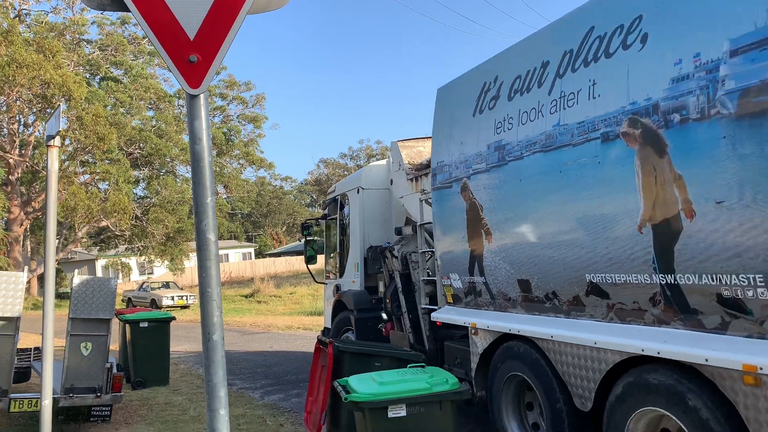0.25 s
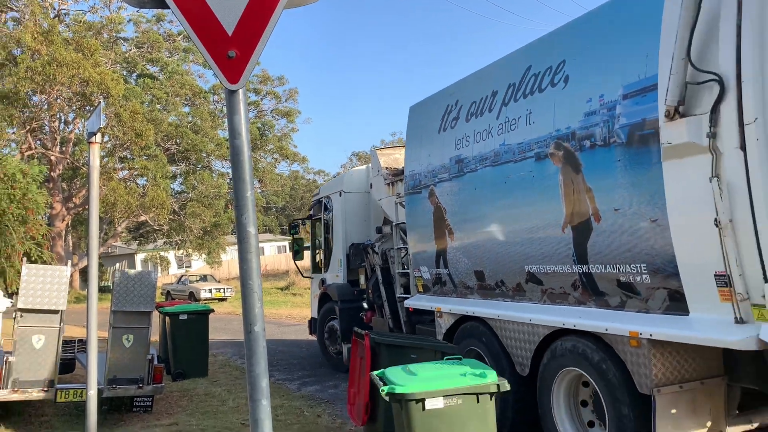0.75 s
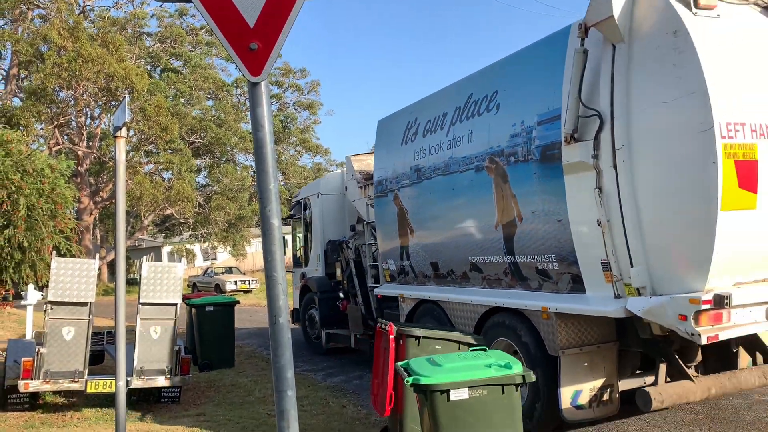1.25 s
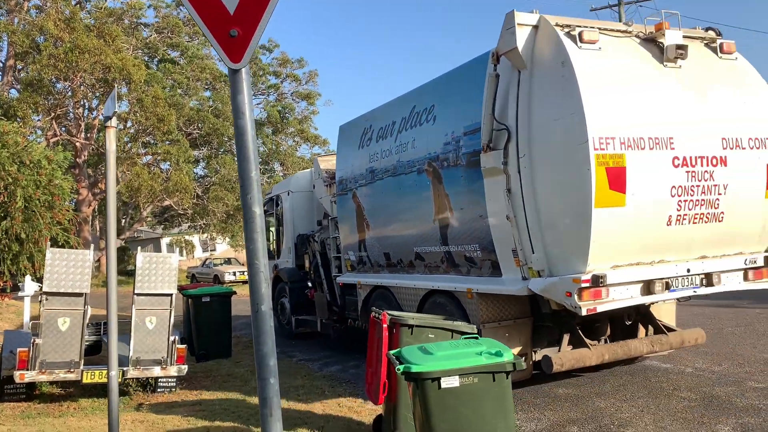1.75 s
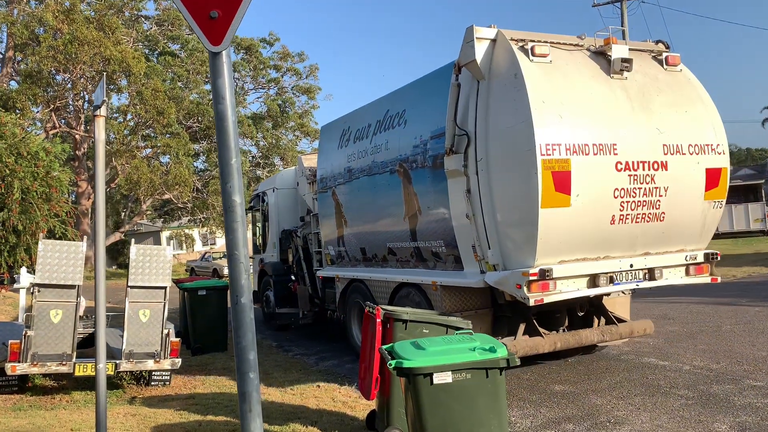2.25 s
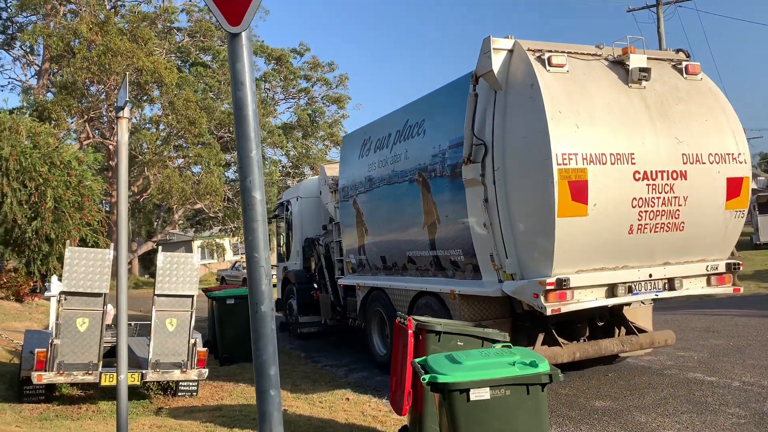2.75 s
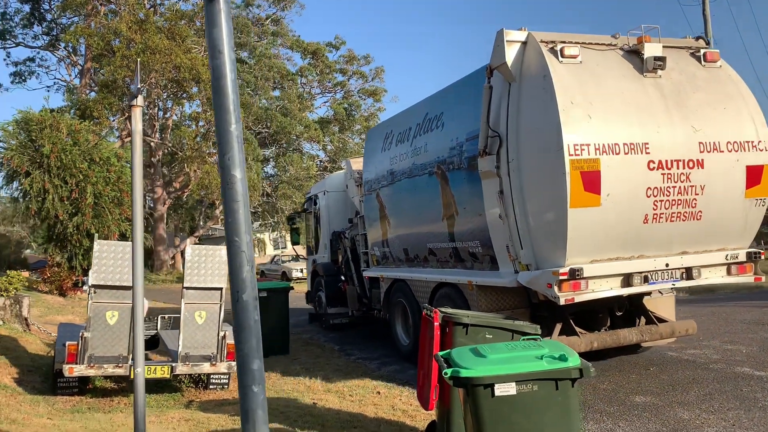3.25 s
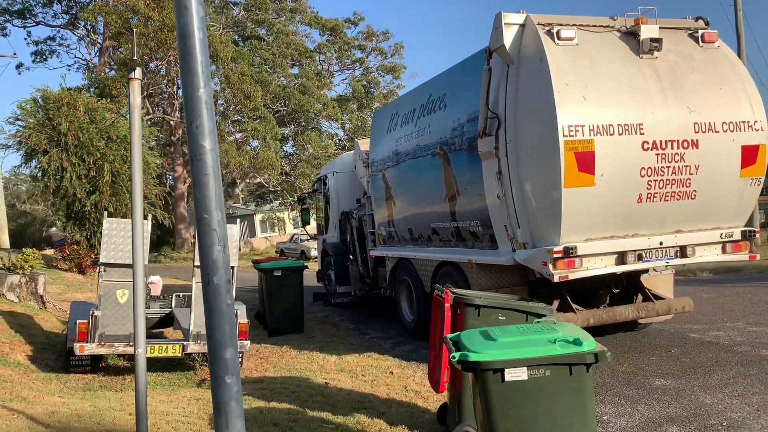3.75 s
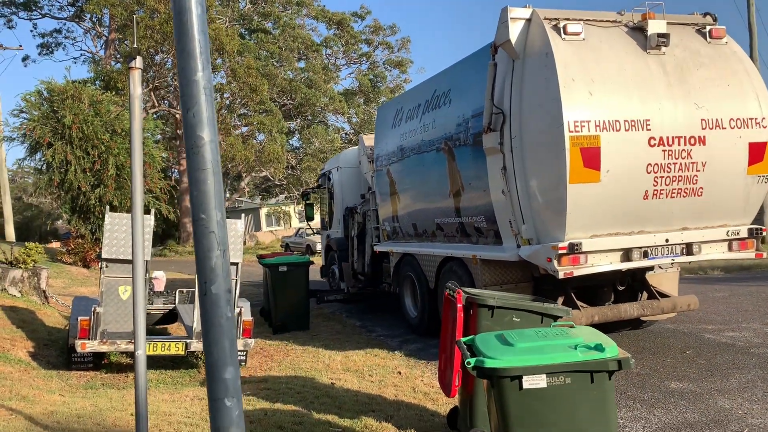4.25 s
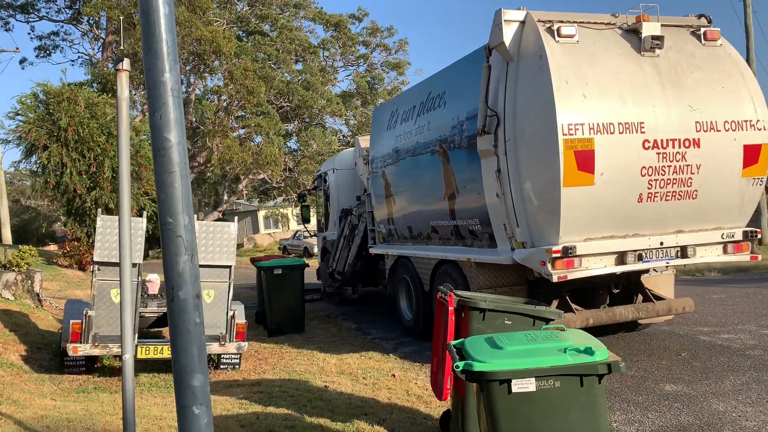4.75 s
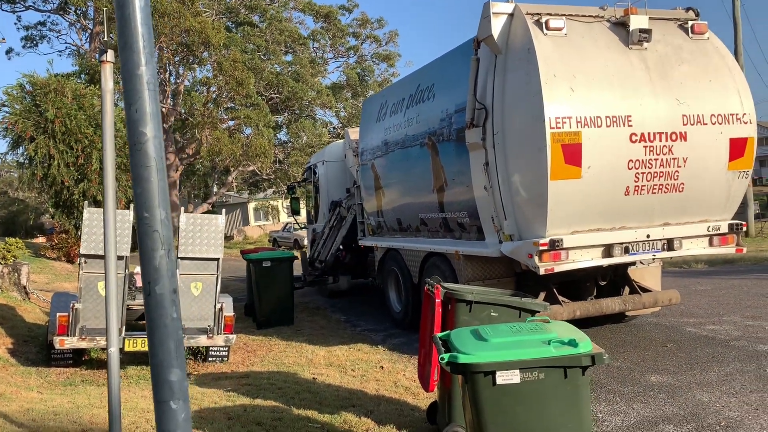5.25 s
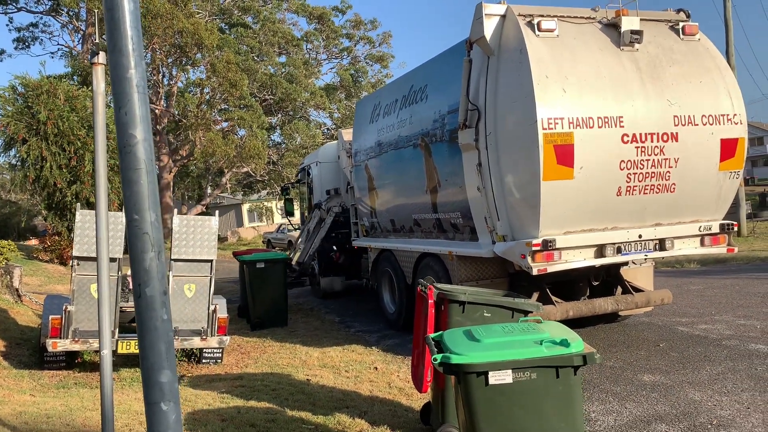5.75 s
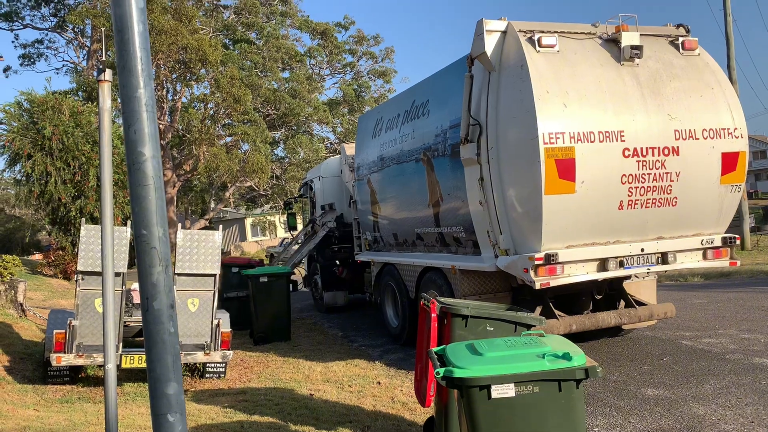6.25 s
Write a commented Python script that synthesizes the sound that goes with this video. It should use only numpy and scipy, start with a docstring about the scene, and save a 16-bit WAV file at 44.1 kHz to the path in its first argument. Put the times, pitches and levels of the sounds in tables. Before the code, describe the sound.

Close on a quiet street, a garbage truck's diesel growls and rises under throttle with a turbo whine, then abruptly falls as it coasts. Tyre rumble fades, brakes faintly squeal and groan, the engine catches in uneven surges and settles to a clattering idle. Steel clanks and a thump mark the stop. Dull knocks follow, then the bin arm hums and lands with a clank, thump and air puff. Outdoor handheld stereo.

```python
"""A six-cylinder diesel throbs, growls and whines as a garbage truck pulls past; the driver lifts off and brakes.
Firing rate and fuel set the exhaust orders and the noise pulses that ring block, covers and panels.
A turbo tone follows the throttle, gears whine, tyres rumble to standstill; gated, nearly pure tones squeal,
groan and squeak. Noise bursts through resonant modes clank, knock and scrape, with a faint answer from houses.
At idle a pump loads up, its housing and hoses ring, and it hums as the bin arm moves."""
import sys
import numpy as np
from scipy import signal
from scipy.fft import rfft, irfft, next_fast_len
from scipy.io import wavfile
from scipy.ndimage import uniform_filter1d, map_coordinates

SR = 44100
rng = np.random.default_rng(int(sys.argv[2]) if len(sys.argv) > 2 else 0)


def output_pcm(signal):
    """Save a mono or channel-first signal as 16-bit PCM at the path in sys.argv[1].

    Samples are clipped to [-1, 1] before scaling.
    """
    pcm = np.clip(np.atleast_2d(signal).T, -1, 1) * 32767
    wavfile.write(sys.argv[1], SR, np.round(pcm).astype(np.int16))


N = 286650
TIME_S = np.arange(N) / SR

# engine speed, which revs, sinks, hunts and settles: t/s, firing rate/Hz
SPEED = [(0, 71.5), (.5, 79.4), (.68, 80.6), (.76, 75.6), (.85, 61.5), (1, 51.6), (1.19, 44.7),
         (1.66, 33.8), (1.86, 39.3), (1.98, 48.2), (2.11, 35.5), (2.28, 42.5), (2.4, 38), (2.53, 41.3),
         (3, 41.9), (5.39, 41.9), (5.6, 41.3)]
# pulling, coasting, a catch near stalling, one cut, idle: t/s, fuel over idle/dB
FUEL = [(0, 8.5), (.69, 7.7), (.77, -6), (1.05, -6), (1.35, -5.5), (1.6, -7.5), (1.72, -2.5), (1.87, -1),
        (1.96, 5), (2.03, 1), (2.06, -20), (2.095, -14), (2.125, 0), (2.19, 4), (2.3, 1), (2.37, -2),
        (2.44, .5), (4, 0), (4.4, 1)]
LIFT_S, LIFT_FALL_S = .69, 0.04  # driver lifts off; duration of the lift
PUMP_START_S, PUMP_RISE_S = 3.91, 3.2  # arm pump takes up load

# exhaust pipe response: f/Hz, level/dB
PIPE = [(33, -14), (42, -5), (60, 1.5), (72, -0.5), (82, 0), (100, -1), (122, -16), (145, -29),
        (160, -15.5)]
# firing tone and octave before the pipe: level at idle fuel/dB, growth/(dB per dB fuel)
FIRST_DB, FIRST_GROWTH = -20.5, 1.52
OCTAVE_DB, OCTAVE_GROWTH = -20.5, 0.98
# weaker orders of unequal cylinders: multiple of firing rate, level at idle/dB
UNEVEN = [(1.5, -33), (2.5, -46), (3, -36.5), (10 / 3, -36), (4.5, -47), (41 / 6, -43), (8, -46)]
# exhaust growl under throttle: multiple of firing rate, level/dB
GROWL = [(1.5, -35), (3.5, -37.5), (4.5, -35.5), (5, -34.5), (6, -35.5), (6.5, -35.5)]
# manifold and heat shield modes: f/Hz, width/Hz, relative level/dB
RASP = [(420, 60, 0), (495, 60, 1.5), (660, 70, -3), (1190, 110, -5.5), (1600, 150, -8)]
RASP_DB = -33.5

# chassis and silencer spectrum: f/Hz, relative level/dB per Hz
BODY = [(35, -30), (60, -8.5), (105, -8.5), (140, -13.5), (170, -20.5), (230, -17.5), (330, -17),
        (410, -16.5), (540, -16.5), (650, -22.5), (790, -33.5), (1200, -52.5)]
# engine block modes: f/Hz, width/Hz, relative level/dB
BLOCK = [(917, 83, -3.5), (1087, 97, -0.5), (1256, 52, -5), (1497, 50, -6.5), (1935, 106, -9),
         (2330, 336, -13)]
# chassis panel modes: f/Hz, width/Hz, relative level/dB
PANEL = [(1069.3, 26.6, -1), (1472, 22, -14)]
# panel hum, which dips and later swells: t/s, relative level/dB
PANEL_SWELL = [(0, 1), (1.3, -7), (2.3, 2), (3.6, 1.5), (4.4, 2.5), (6.5, 7.5)]
# valve and injector spectrum: f/Hz, relative level/dB per Hz
TICKS = [(800, -31), (1500, -4), (2200, -1.5), (3200, -12), (3750, -4.5), (5100, -8.5), (6800, -15.5),
         (10000, -37)]
# thin steel cover modes: f/Hz, width/Hz, relative level/dB
COVERS = [(2643, 45, 3.5), (2819, 11, -1), (2980, 16, -1.5), (3340, 20, 0), (3480, 20, -0.5),
          (3610, 21, 1.5), (3882, 22, 2.5), (4230, 28, -5), (4730, 37, -3), (5120, 20, -6.5)]
# fan and intake air spectrum, also the puffs': f/Hz, relative level/dB per Hz
AIR = [(100, -52), (550, 2), (780, 2), (1200, 6.5), (2200, 9), (4000, -5), (7000, 3), (10000, -8),
       (11800, 1), (15500, -1.5)]
# laws of the layers: idle level/dB, growth/(dB per speed doubling), growth/(dB per dB fuel), full pump load/dB
BODY_LAW = (-29.5, 8.5, 0.15, 4.5)
KNOCK_LAW = (-38, 7.5, 0.07, -2)
PANEL_LAW = (-39.5, 4.5, 0.35, -2.5)
TICK_LAW = (-43.5, 4.5, 0.5, 1.5)
COVER_LAW = (-51.5, 9, 0.58, 5)
AIR_LAW = (-42.5, 10.5, 0.35, 1.5)
OVERRUN_DB = -6  # below this fuel the clatter is all mechanical
WANDER_DB = 1.5  # scale of each layer's slow random swing
# engine's ground bounce: t/s, extra path/m, share reflected
GROUND = [(0, 0.22, 0.12), (3.9, 0.22, 0.22), (4.7, 0.26, 0.44), (5.9, 0.26, 0.51), (6.5, 0.22, 0.72)]

TURBO_START_HZ, TURBO_IDLE_HZ = 10450, 5840
SPOOL_HZ_PER_S, WIND_DOWN_S = 2950, .75  # rise under throttle; time constant of the fall
RESPOOL_S, RESPOOL_HZ_PER_S = 5.65, 480  # pump load lifts the tone again
BOOST_DB, WHISTLE_DB = -46.5, -55  # broad tone under throttle; thin tone
FREE_SHARE = .36  # broad tone left at lift-off
WHISTLE_FROM_S = 2.1  # thin tone emerges as the engine picks up again

# tyres and swaying body spectrum: f/Hz, relative level/dB per Hz
ROLL = [(40, -20), (90, 4.5), (130, 0), (200, -2), (280, -3), (380, -13), (500, -4.5), (760, -28.5),
        (1100, -24.5), (1800, -24.5), (3500, -38.5)]
ROLL_DB, BRAKE_S, STOP_S = -28, 0.67, 3.1

# loose steel clusters: t/s, level/dB, length/s, dull above f/Hz
CLANKS = [(.877, -31, 0.011, 3000), (1.209, -29, .008, 1900), (2.247, -31.5, 0.04, 6000),
          (2.627, -22.5, 0.038, 5500), (2.68, -30, 0.026, 4500), (2.768, -35.5, 0.048, 2200),
          (2.818, -30, 0.034, 2300), (3.075, -34, 0.045, 4400), (3.135, -35, 0.016, 5000),
          (3.172, -29.5, 0.022, 4000), (3.2, -27, 0.026, 4000), (4.565, -37, .012, 7000),
          (4.635, -37, .012, 7000), (4.775, -37, .012, 6000), (6.095, -33, .02, 2800),
          (6.128, -29, 0.02, 5500), (6.157, -27.5, 0.055, 4000)]
# single hard steel blows: t/s, level/dB, length/s, dull above f/Hz
STRIKES = [(1.221, -25, .002, 1600), (1.225, -21.5, .003, 1600), (1.231, -25, .002, 1600),
           (2.272, -29, .006, 5000), (2.637, -25, .003, 5000), (2.645, -18.5, .005, 6000),
           (2.661, -20, .004, 8000), (2.698, -29, .007, 4200), (3.101, -34, .003, 7000),
           (3.142, -29, .003, 4600), (3.195, -29.5, .003, 3200), (3.218, -24.5, .004, 4400),
           (3.233, -27.5, .003, 3400), (6.144, -21, .002, 5500), (6.162, -19.5, .003, 2800),
           (6.169, -24, .004, 2600), (6.187, -25, .003, 4000), (6.204, -23, .003, 7000),
           (6.27, -32, .004, 4000)]
# body panel and bin arm modes: f/Hz, width/Hz, relative level/dB
STEEL = [(1137, 260, 10.5), (1420, 540, 9), (1740, 370, 6), (2180, 330, 1.5), (2940, 340, 1.5),
         (3355, 190, 0.5), (3920, 450, 4.5), (4000, 90, -1), (4480, 440, -4), (5100, 410, -0.5),
         (5740, 1600, -10.5)]
# dull knocks and short swells of a hollow ring near 1.1 kHz: t/s, level/dB, length/s, dull above f/Hz
DULL_RINGS = [(4.354, -28.5, .022, 2400), (4.392, -30, .014, 2400), (5.022, -27, .02, 2400),
              (5.456, -27.5, .028, 2400), (5.528, -29, .014, 2000)]
# modes of the dull knocks and swells: f/Hz, width/Hz, relative level/dB
HOLLOW = [(872, 48, 14.5), (1110, 70, 11), (1440, 160, 4), (1850, 200, 2), (2280, 400, 0)]
# decay of the street's answer: f/Hz, t60/s
STREET = [(150, 0.28), (2000, 0.49), (10000, 0.044)]
# squeals, a low groan, later thin squeaks and a chirp: t/s, length/s, start f/Hz, end f/Hz, level/dB
PURE_NOTES = [(1.28, .08, 12050, 12060, -52), (1.5, .58, 5658, 5670, -56), (2.13, .22, 5672, 5665, -51),
              (2.345, .06, 5665, 5665, -44), (2.39, .08, 5662, 5660, -48), (2.05, .8, 282, 268, -38.5),
              (2.22, .3, 11320, 11340, -62), (3.6, .15, 12110, 12150, -48), (3.72, .14, 12170, 12210, -55),
              (4.225, .05, 6060, 6100, -40)]
# air valve puffs: t/s, level/dB, length/s
PUFFS = [(1.9, -61, 0.057), (2.17, -52, 0.1), (6.097, -35, 0.081)]
# scrapes of brake shoes and arm slide: peak t/s, level/dB, half length/s
SCRAPES = [(2.675, -33, .04), (2.8, -38.5, .08), (3.12, -40, .05), (3.22, -35.5, .03), (6.19, -30, .065)]
# scrape spectrum: f/Hz, relative level/dB per Hz
SCRAPE = [(300, -28), (560, 13.5), (760, 2), (1300, 2), (2500, -4), (4600, -8.5), (6000, -10), (10000, -20)]
# heavy body thumps at the stop and arm moves: t/s, level/dB, length/s
THUMPS = [(2.65, -28.5, 0.22), (4.224, -32, 0.29), (4.35, -25.5, 0.054), (6.082, -18.5, 0.125)]
# thump spectrum: f/Hz, relative level/dB per Hz
THUD = [(28, -53), (50, 3), (70, -6.5), (120, -15), (220, -16.5), (500, -18.5), (900, -57), (3000, -88)]
# pump housing and hose modes: f/Hz, width/Hz, relative level/dB
HOSES = [(326.4, 18, 4.5), (408, 26.6, 4.5), (549, 18, -2.5), (861, 68, -6), (2490, 390, -15),
         (3750, 690, -22)]
ARM_S, ARM_HUM_DB = 5.65, -38  # arm moves out, the straining pump hums

# left-right likeness of diffuse layers: f/Hz, likeness (-1 to 1)
ALIKE = [(60, 0.91), (300, 1), (640, 0.64), (1200, 1), (2200, 0.27), (4500, 0.21), (12000, -0.13)]
# microphone ports with two treble dips: f/Hz, level/dB
PORTS = [(7000, -0.5), (8400, -22.5), (9800, 8), (12450, -0.5), (13400, -22), (14700, 3)]
# channel imbalance: f/Hz, left minus right/dB
LEAN = [(60, 1), (200, 0.5), (400, 2), (700, 2.5), (1300, -1), (2400, 0), (4400, -3), (8000, 0)]
# channel phase: f/Hz, left lead/rad
SKEW = [(60, -0.24), (300, -0.082), (650, -0.44), (950, -0.89), (2900, 0.99), (7000, 0.35)]
TOP_HZ = 15850


def amp(db):
    """Decibels to gain."""
    return 10 ** (np.asarray(db) / 20)


def unit(x):
    """Scale to rms 1."""
    return x / np.sqrt(np.mean(x ** 2) + 1e-20)


def along(points, hz):
    """Read (f/Hz, value) points on a log-frequency axis."""
    f, value = np.transpose(points)
    return np.interp(np.log(hz + 1), np.log(f + 1), value)


def curves(rows):
    """One per-sample curve for each column after the time."""
    s, *columns = np.transpose(rows)
    return [np.interp(TIME_S, s, column) for column in columns]


def wobble(rate_hz):
    """Smooth random curve with rate_hz knots per second."""
    return map_coordinates(rng.standard_normal(400), [TIME_S * rate_hz], mode="wrap")


def noise():
    """Two channels of white noise."""
    return rng.standard_normal((2, N))


def filtered(x, response):
    """Apply a complex frequency response."""
    size = next_fast_len(N + SR // 4)
    spectrum = rfft(x, size) * response(np.fft.rfftfreq(size, 1 / SR))
    return irfft(spectrum, size)[..., :N]


def colour(points):
    """Response of a (f/Hz, level/dB) spectrum."""
    return lambda hz: amp(along(points, hz))


def resonances(modes, low_hz):
    """Response of damped modes on a panel that radiates little below low_hz."""
    def response(f):
        ring = 0
        for k, (centre, width, db) in enumerate(modes):
            mode = 1j * f * width / (centre * centre - f * f + 1j * f * width)
            ring = ring + (-1) ** k * amp(db) * mode  # alternating sign
        return ring * f ** 4 / (f ** 4 + low_hz ** 4)
    return response


def spread(pair, response):
    """Colour two unrelated signals and mix to left and right with frequency-dependent likeness."""
    def mid_side(hz):
        turn = np.arccos(np.clip(along(ALIKE, hz), -1, 1)) / 2
        return response(hz) * np.array([np.cos(turn), np.sin(turn)])
    mid, side = filtered(pair, mid_side)
    return np.array([mid + side, mid - side])


def burst(start_s, length_s, fall_s):
    """Envelope: fast rise, hold, exponential fall."""
    t = TIME_S - start_s
    return np.clip(t / 0.0058, 0, 1) * np.exp(-np.clip((t - length_s) / fall_s, 0, 50))


def throttle():
    """1 while pulling, 0 once the driver has lifted off."""
    return np.clip(1 - (TIME_S - LIFT_S) / LIFT_FALL_S, 0, 1)


def pump():
    """Hydraulic pump load, 0 to 1."""
    return np.clip((TIME_S - PUMP_START_S) / PUMP_RISE_S, 0, 1)


def strokes(phase, decay, scatter_db, alternate_db, bed):
    """One dying blow per whole phase over a steady bed; strength scatters and alternates."""
    index = phase.astype(int)
    luck = rng.uniform(-2, 2, size=2000)[index]
    size_db = scatter_db * luck + alternate_db * np.cos(np.pi * index)
    blows = amp(size_db) * np.exp(-(phase % 1) / decay)
    return bed + uniform_filter1d(blows, size=200)  # softened onset


def cyclic(phase, share):
    """Noise that partly repeats every six-firing engine cycle, its pattern slowly drifting."""
    cycles = rng.standard_normal(size=(2, 2, 4096))
    place = (phase / 6 % 1 * 4096).astype(int)
    drift = .8 * wobble(2)
    pattern = np.cos(drift) * cycles[0][:, place] + np.sin(drift) * cycles[1][:, place]
    return np.sqrt(share) * pattern + np.sqrt(1 - share) * noise()


def exhaust(phase, firing_hz, fuel_db):
    """Pipe sounds the firing rate, its octave and unequal-cylinder orders; growls under throttle."""
    angle = 2 * np.pi * phase
    first_db = FIRST_DB + FIRST_GROWTH * fuel_db + along(PIPE, firing_hz)
    second_db = OCTAVE_DB + OCTAVE_GROWTH * fuel_db + along(PIPE, 2 * firing_hz)
    unsteady_db = .75 * amp(-1.5 * np.clip(fuel_db, -7, 0))  # lean firing is uneven
    first = amp(first_db + unsteady_db * wobble(13)) * np.cos(angle)
    octave = amp(second_db + 0.67 * unsteady_db * wobble(12)) * np.cos(2 * angle)
    lope = sum(amp(db + 1.5 * wobble(7)) * np.sin(order * angle + .35 * wobble(10))
               for order, db in UNEVEN)
    growl = sum(amp(db + 3 * wobble(7)) * np.sin(order * angle + .5 * wobble(13))
                for order, db in GROWL)
    unequal = amp(.7 * np.minimum(fuel_db, 0))  # cylinders differ less on little fuel
    orders = (1 - throttle()) * unequal * lope + throttle() * growl
    return np.sqrt(2) * (first + octave + orders)


def rasp(phase):
    """Hard, uneven firings shake the manifold and heat shield under throttle."""
    pulses = strokes(phase, decay=.35, scatter_db=1.5, alternate_db=1.5, bed=.2)
    blows = cyclic(phase, share=.8) * pulses
    return amp(RASP_DB) * throttle() * unit(spread(blows, resonances(RASP, low_hz=330)))


def engine(phase, firing_hz, fuel_db):
    """Firings shake chassis, block and panel; valves tick at twice the rate and ring covers; air rushes."""
    shake = cyclic(phase, share=.72) * strokes(phase, decay=1.0, scatter_db=.7, alternate_db=1.0, bed=0.4)
    clatter = cyclic(phase, share=.7) * strokes(phase, decay=0.55, scatter_db=1.0, alternate_db=0.3, bed=0.6)
    drive = cyclic(phase, share=.85) * strokes(phase, decay=0.5, scatter_db=.5, alternate_db=0.3, bed=0.45)
    tapping = strokes(2 * phase, decay=1.0, scatter_db=4.5, alternate_db=1.0, bed=1.0)
    rattle = noise() * strokes(2 * phase, decay=.4, scatter_db=2.0, alternate_db=1.0, bed=.3)
    body = spread(shake, colour(BODY))
    knock = spread(clatter, resonances(BLOCK, low_hz=755))
    panel = spread(drive, resonances(PANEL, low_hz=900)) * amp(curves(PANEL_SWELL)[0])
    ticks = spread(cyclic(phase, share=0.3) * tapping, colour(TICKS))
    covers = spread(rattle, resonances(COVERS, low_hz=2000))
    air = spread(noise() * amp(1.3 * wobble(40)), colour(AIR))

    doublings = np.log2(firing_hz / firing_hz[-1])
    burning_db = np.maximum(fuel_db, OVERRUN_DB)
    layers = [(body, BODY_LAW), (knock, KNOCK_LAW), (panel, PANEL_LAW),
              (ticks, TICK_LAW), (covers, COVER_LAW), (air, AIR_LAW)]
    out = np.zeros((2, N))
    for sound, (idle_db, speed_db, fuel_growth, pump_db) in layers:
        work_db = speed_db * doublings + fuel_growth * burning_db + pump_db * pump()
        out += unit(sound) * amp(idle_db + work_db + WANDER_DB * wobble(7))
    return out


def off_the_road(x):
    """A slightly late ground reflection cuts a shifting comb; grass swallows its treble."""
    path_m, share = curves(GROUND)
    late_s = TIME_S - path_m / 343  # speed of sound, m/s
    soft = filtered(x, lambda hz: 1 / (1 + (hz / 4200) ** 6))
    bounce = np.array([map_coordinates(channel, [late_s * SR], order=3) for channel in soft])
    return x + share * bounce


def whistle(hz, width_hz):
    """Tone following hz, blurred into a narrow noise band."""
    blur = filtered(noise(), lambda f: np.exp(-(f / width_hz) ** 2))
    angle = 2 * np.pi * np.cumsum(hz) / SR
    left = blur[0] * np.cos(angle) + blur[1] * np.sin(angle)
    right = blur[0] * np.cos(angle + 1) + blur[1] * np.sin(angle + 1)
    return unit(np.array([left, right]))


def whines(firing_hz):
    """Turbo blade tone, broad under throttle and thin later; gear whine fades as the cab moves away."""
    spooled_hz = TURBO_START_HZ + SPOOL_HZ_PER_S * np.minimum(TIME_S, LIFT_S)
    spin = np.exp(-np.maximum(TIME_S - LIFT_S, 0) / WIND_DOWN_S)
    respool_hz = RESPOOL_HZ_PER_S * np.maximum(TIME_S - RESPOOL_S, 0)
    turbo_hz = TURBO_IDLE_HZ + (spooled_hz - TURBO_IDLE_HZ) * spin + respool_hz
    boost = np.maximum(throttle(), FREE_SHARE * spin)
    broad = amp(BOOST_DB) * boost * whistle(turbo_hz, width_hz=260)
    emerging = np.clip((TIME_S - WHISTLE_FROM_S) / .1, 0, 1)
    thin = amp(WHISTLE_DB + 1.5 * wobble(9)) * emerging * whistle(turbo_hz, width_hz=80)
    gears = amp(-36.5 - 28 * TIME_S) * whistle(40.1 * firing_hz, width_hz=60)
    return broad + thin + gears


def rolling():
    """Tyres rumble and the body jolts, fading until the brakes stop the truck."""
    motion = np.clip((STOP_S - TIME_S) / (STOP_S - BRAKE_S), 0, 1)
    jolts = amp(2.5 * wobble(24))
    return amp(ROLL_DB) * motion * unit(spread(noise() * jolts, colour(ROLL)))


def clanks(hits, modes, attack_s, fall_s):
    """Noise bursts ring the modes; soft contacts are dull, each spot has its own colour."""
    out = np.zeros((2, N + SR))
    size = SR // 3
    t, hz = np.arange(size) / SR, np.fft.rfftfreq(size, 1 / SR)
    body = resonances(modes, low_hz=800)(hz)
    for s, db, length_s, dull_hz in hits:
        contacts = rng.standard_normal((3, size)) * amp(2.2 * wobble(300)[:size])
        stereo = contacts[0] + 1.05 * contacts[1:]  # shared plus one per channel
        spot_db = 3 * map_coordinates(rng.standard_normal(200), [hz / 120], mode="wrap")
        softness = 1 / np.sqrt(1 + (hz / dull_hz) ** 6)
        ring = irfft(rfft(stereo) * body * amp(spot_db) * softness, size)
        shape = np.clip(t / attack_s, 0, 1) * np.exp(-np.maximum(t - length_s, 0) / fall_s)
        start = round(s * SR)
        out[:, start:start + size] += amp(db) * shape * unit(ring)
    return out[:, :N]


def street(x):
    """Answer of houses and trees: decaying noise, treble dying first."""
    hz, t, bins = signal.stft(rng.standard_normal((2, SR // 2)), SR, nperseg=256)
    decay_db = -60 * t / along(STREET, hz)[:, None]
    tail = signal.istft(bins * amp(decay_db), SR, nperseg=256)[1]
    return signal.fftconvolve(x, tail / np.linalg.norm(tail[0]), axes=1)[:, :N]


def pure_notes():
    """Squeals, a low groan, and later thin squeaks and a chirp: gated, fluttering, nearly pure notes."""
    out = np.zeros(N)
    for s, length_s, start_hz, end_hz, db in PURE_NOTES:
        end_s = s + length_s
        hz = np.interp(TIME_S, [s, end_s], [start_hz, end_hz]) + 4 * wobble(31.9)
        gate = np.clip(np.minimum(TIME_S - s, end_s - TIME_S) / .03, 0, 1)
        flutter_db = 3 * wobble(26)
        out += gate * amp(db + flutter_db) * np.sin(2 * np.pi * np.cumsum(hz) / SR)
    return np.sqrt(2) * out


def puffs():
    """Compressed air escapes in short hisses."""
    envelope = sum(amp(db) * burst(s, length_s, fall_s=0.028) for s, db, length_s in PUFFS)
    return unit(spread(noise(), colour(AIR))) * envelope


def scrapes():
    """Steel slides under load: dense, grainy hiss, swelling and fading."""
    grain = amp(3.2 * wobble(400))
    swell = sum(amp(db) / np.cosh(np.clip((TIME_S - s) / half_s, -30, 30)) for s, db, half_s in SCRAPES)
    return swell * unit(spread(noise() * grain, colour(SCRAPE)))


def thumps():
    """The hollow body booms briefly."""
    envelope = sum(amp(db) * burst(s, length_s, fall_s=0.054) for s, db, length_s in THUMPS)
    return unit(spread(noise(), colour(THUD))) * envelope


def hydraulics(phase):
    """Loaded pump pulses at the firing rate, rings housing and hoses, and hums as the arm moves."""
    pulses = cyclic(phase, share=.6) * strokes(phase, decay=.6, scatter_db=1.0, alternate_db=.5, bed=.5)
    ring = unit(spread(pulses, resonances(HOSES, low_hz=268)))
    housing = amp(-31.0 + 0.78 * wobble(8.8)) * np.sqrt(pump()) * ring
    moving = np.clip((TIME_S - ARM_S) / .2, 0, 1)
    tone = np.sin(5 * 2 * np.pi * phase + .6 * wobble(10))  # fifth order of the firing rate
    hum = np.sqrt(2) * amp(ARM_HUM_DB + 2 * wobble(8)) * moving * tone
    return housing + hum


def scene():
    """Firing rate and fuel drive the engine layers; rolling, squeals, air, steel and pump add to them."""
    firing_hz, = curves(SPEED)
    fuel_db, = curves(FUEL)
    phase = np.cumsum(firing_hz) / SR  # in firings
    motor = exhaust(phase, firing_hz, fuel_db) + rasp(phase)
    motor = motor + off_the_road(engine(phase, firing_hz, fuel_db)) + whines(firing_hz)
    metal = clanks(CLANKS, STEEL, attack_s=.017, fall_s=.019)
    metal += clanks(STRIKES, STEEL, attack_s=.001, fall_s=.004)
    metal += scrapes()
    metal += clanks(DULL_RINGS, HOLLOW, attack_s=.012, fall_s=.016)
    answer = amp(-12.5) * street(metal)
    return motor + rolling() + metal + answer + pure_notes() + puffs() + thumps() + hydraulics(phase)


def record(dry):
    """Two slightly different microphones colour the sound; nothing passes above the band limit."""
    apart = np.array([[.5], [-.5]])  # left, right

    def ports(hz):
        gain = amp(along(PORTS, hz) + apart * along(LEAN, hz))
        return gain * np.exp(1j * apart * along(SKEW, hz)) * (hz < TOP_HZ)
    return filtered(dry, ports)


dry = scene()
out = record(dry)
output_pcm(out)
```